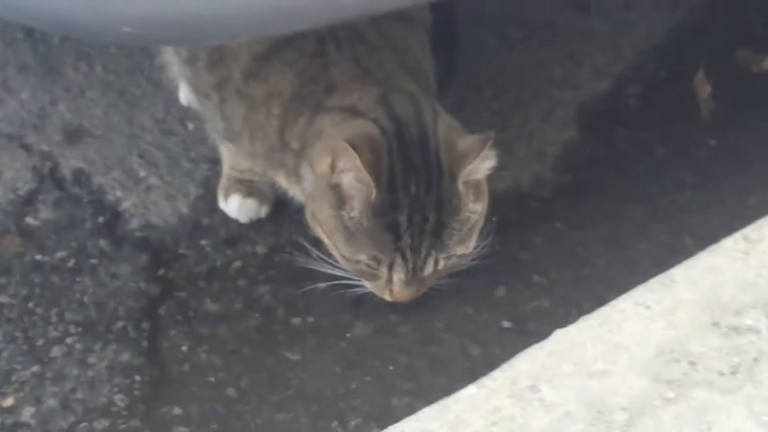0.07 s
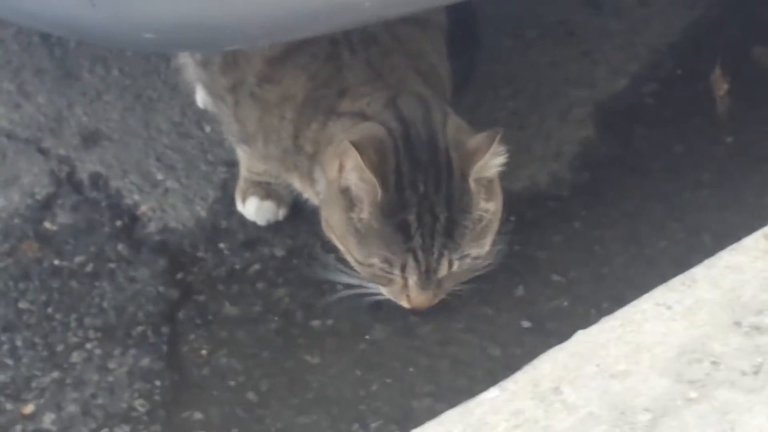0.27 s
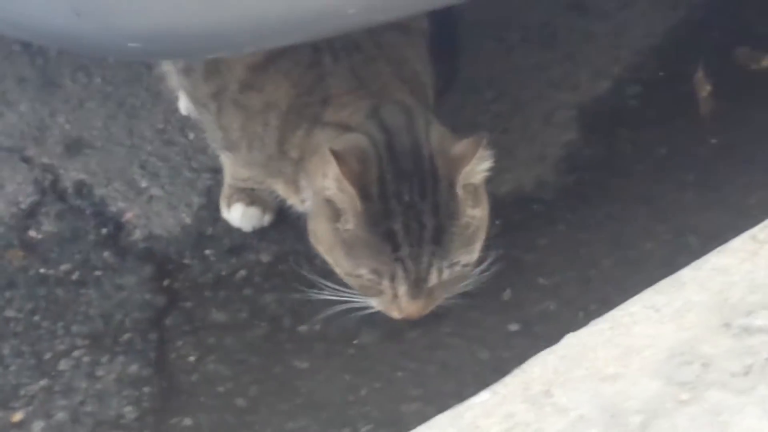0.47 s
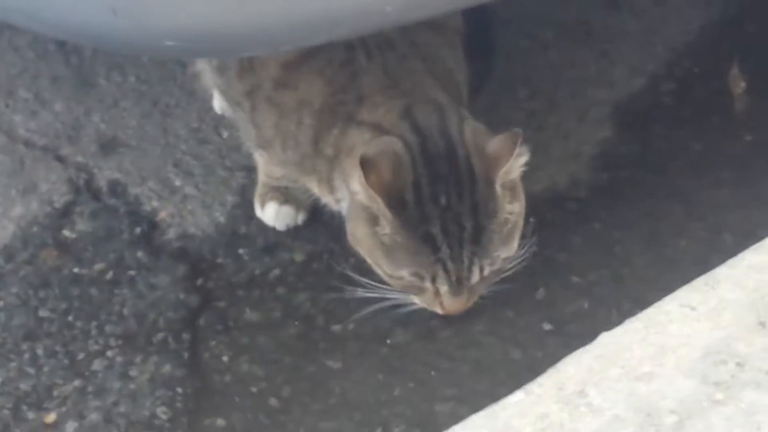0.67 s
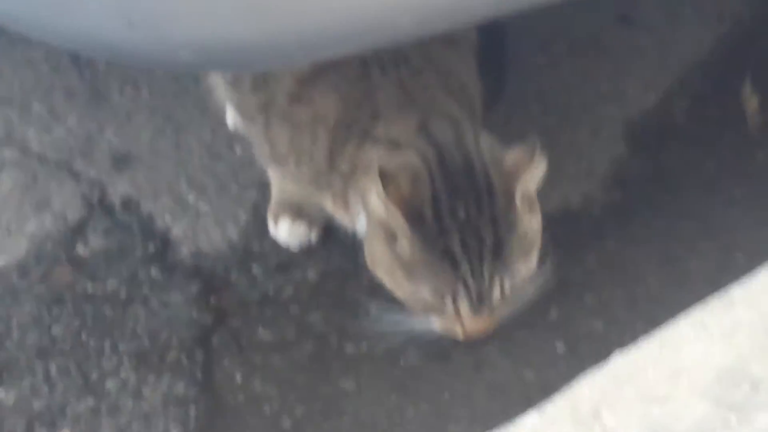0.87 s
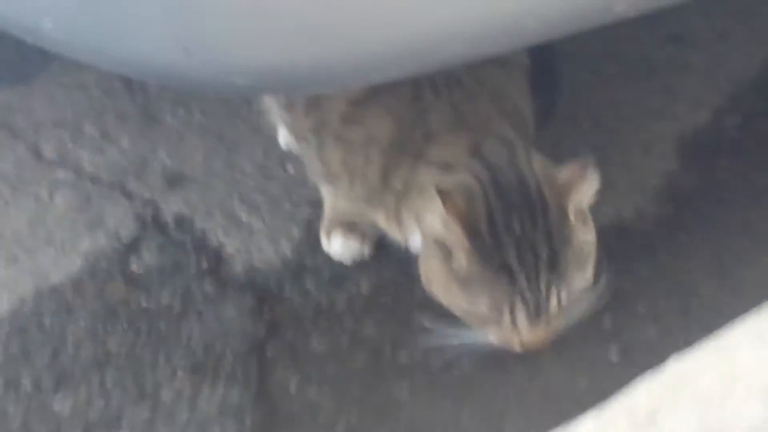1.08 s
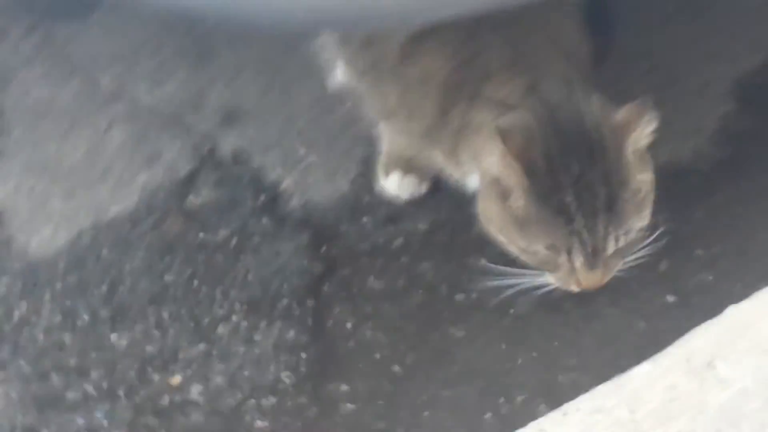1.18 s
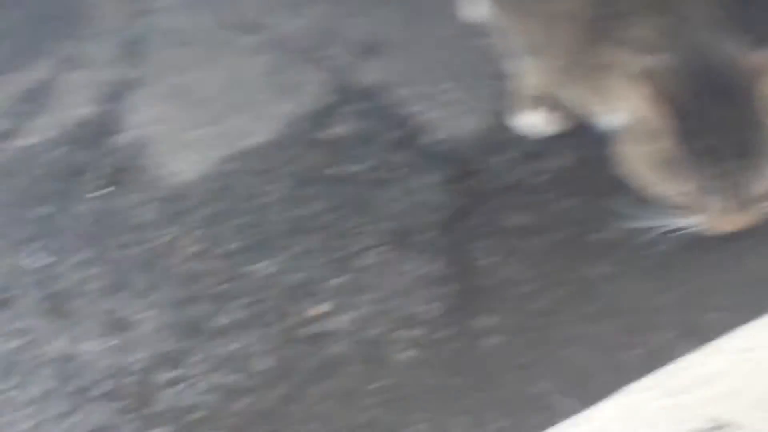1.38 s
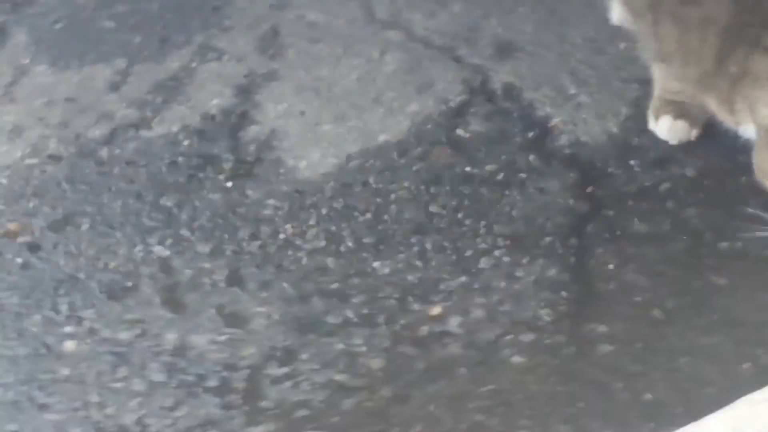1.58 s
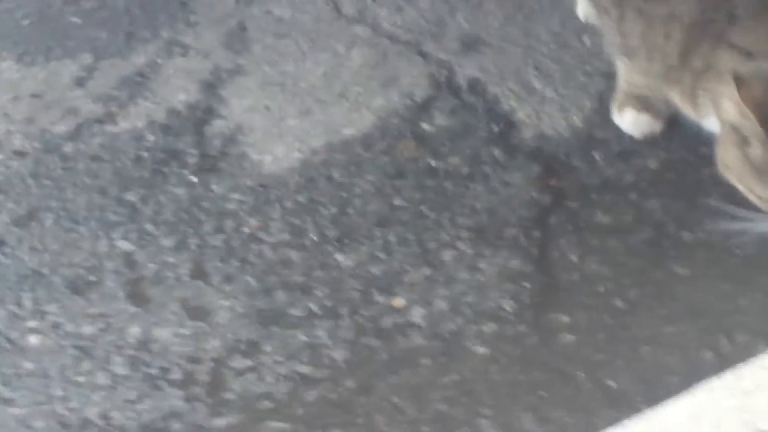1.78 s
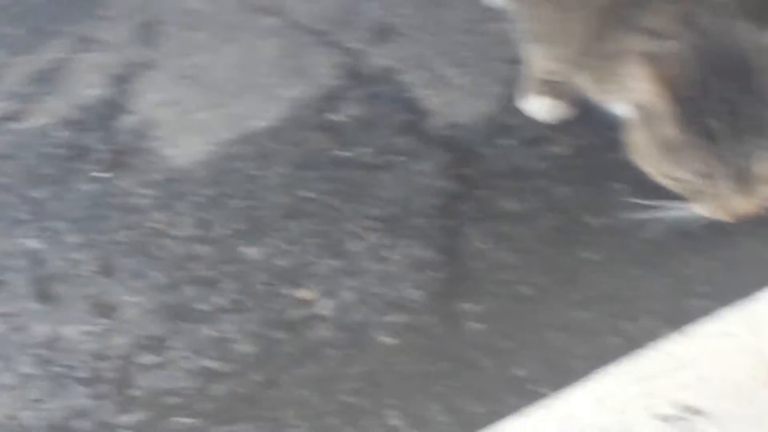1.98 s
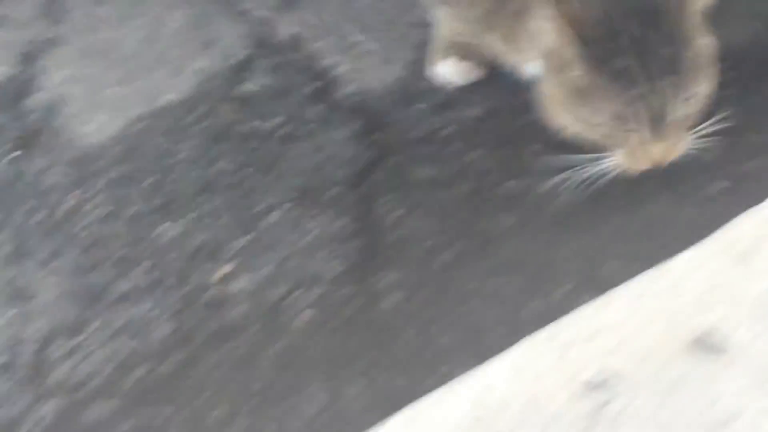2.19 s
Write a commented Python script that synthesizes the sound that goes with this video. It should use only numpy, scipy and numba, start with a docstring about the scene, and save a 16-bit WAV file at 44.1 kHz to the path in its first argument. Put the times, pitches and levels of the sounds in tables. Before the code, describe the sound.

Low roadside traffic rumble and hiss swell, then fade, with sharp camera handling clicks.

```python
"""Roadside traffic: engine rumble, a low steady hum, tyre roar and a high hiss. They swell as the
hand-held camera swings aside, then sink away. Fingers click on its casing by the left microphone;
the hardest click overloads it and the limiter ducks briefly. Later a fingertip brushes the casing
with three faint stick-slip squeaks."""
import sys
import numpy as np
from scipy import signal
from scipy.fft import rfft, irfft
from scipy.io import wavfile
from scipy.ndimage import uniform_filter1d, minimum_filter1d
from numba import njit

SR = 44100
rng = np.random.default_rng(int(sys.argv[2]) if len(sys.argv) > 2 else 0)


def waveform_to_disk(signal):
    """Save audio, clipped to [-1, 1], as 16-bit WAV at the path in sys.argv[1]."""
    frames = np.transpose(np.atleast_2d(signal))
    scaled = np.clip(frames, -1, 1) * 32767
    samples = np.round(scaled).astype(np.int16)
    wavfile.write(sys.argv[1], SR, samples)


N = 99225

# traffic levels: t/s, rumble/dB, drone/dB, tyre roar/dB
TRAFFIC_LEVELS = [(0, -50.5, -45.5, -48.5), (.28, -43.5, -47, -47.5), (.5, -44, -47, -48),
                  (.72, -53.5, -44.5, -48.5), (.9, -46.5, -48, -47.5), (1.1, -45, -40.5, -49),
                  (1.22, -45.5, -39, -45), (1.34, -48, -40.5, -50), (1.45, -49.5, -47, -57.5),
                  (1.65, -61, -61.5, -64), (1.92, -59, -60.5, -63), (2.08, -57.5, -62, -67.5),
                  (2.25, -61, -64.5, -63.5)]


def undb(db):
    """Decibels to gain."""
    return 10 ** (np.asarray(db) / 20)


def unit(x):
    """Scale to rms 1."""
    return x / np.sqrt(np.mean(x ** 2))


def curve(rows, column=1):
    """Table column interpolated over time."""
    rows = np.array(rows)
    return np.interp(np.arange(N) / SR, rows[:, 0], rows[:, column])


def per_bin(points):
    """(f/Hz, value) points interpolated over log frequency."""
    hz, value = np.array(points).T
    return np.interp(np.log(np.fft.rfftfreq(N, 1 / SR) + 1), np.log(hz), value)


def drift(rate_hz):
    """Smooth random drift, rms 1."""
    k = int(SR / rate_hz)
    steps = np.repeat(rng.standard_normal(N // k + 1), k)
    return unit(uniform_filter1d(uniform_filter1d(steps, k), k)[:N])


def wavering_sine(hz, wander, rate_hz):
    """Sine with drifting pitch; wander is the relative rms deviation."""
    phase = 2 * np.pi * np.cumsum(hz * (1 + wander * drift(rate_hz))) / SR
    return np.sin(phase)


def mode(hz, t60_s):
    """Damped sine, 20 ms."""
    t = np.arange(SR // 50) / SR
    return np.sin(2 * np.pi * hz * t) * np.exp(-np.log(1000) * t / t60_s)


def swell(start_s, length_s):
    """Rounded rise and fall."""
    progress = np.clip((np.arange(N) / SR - start_s) / length_s, 0, 1)
    return np.sqrt(np.abs(np.sin(np.pi * progress)))


def cut(x, hz, kind, order):
    """High-pass or low-pass."""
    return signal.sosfilt(signal.butter(order, min(hz, SR * .45), kind, fs=SR, output="sos"), x)


def diffuse_noise(spectrum):
    """Noise at two close microphones, alike in the bass; their mean has rms 1."""
    # left-right likeness: f/Hz, correlation
    likeness = [(60, 0.94), (130, 0.98), (290, 0.9), (640, 0.39), (1350, -0.36), (2500, 0.033),
                (6800, 0.14), (15000, -0.85)]
    # balance: f/Hz, left minus right/dB
    balance = [(100, 0), (1000, 1.1), (2400, 0.5), (4600, 5), (6200, 2.5), (8100, -11), (15000, 0.5)]
    mid, side = rfft(rng.standard_normal((2, N)))
    correlation = np.clip(per_bin(likeness), -1, 1)
    sign = np.array([[1], [-1]])
    pair = np.sqrt(1 + correlation) * mid + sign * np.sqrt(1 - correlation) * side
    pair = irfft(pair * undb(per_bin(spectrum) + sign * per_bin(balance) / 2), N)
    return pair / np.std(pair.mean(axis=0))


def hiss():
    """Smooth traffic hiss in three bands: upper-mid wash, treble, top sheen."""
    # spectra: f/Hz, relative level/dB
    wash_spectrum = [(700, -37.5), (1200, 6), (1800, 3), (2500, 0.5), (3300, 0.5), (4500, -7),
                     (8000, -54.5)]
    treble_spectrum = [(2000, -24.5), (3300, -4.5), (3950, -2), (4700, 2), (5800, 2), (6600, -1.5),
                       (8300, -14), (10000, -21), (15000, -27)]
    sheen_spectrum = [(4000, -35), (6000, -3.5), (7200, 3.5), (8600, -2.5), (9800, -6.5), (12000, -8),
                      (15000, -15), (16000, -26)]
    # t/s, level/dB
    wash_level = [(0, -56), (.4, -57), (.55, -58), (.85, -57.5), (.97, -55), (1.12, -55), (1.3, -53),
                  (1.43, -62.5), (1.6, -71), (1.9, -72.5), (2.1, -76.5), (2.25, -75.5)]
    # t/s, treble/dB, sheen/dB
    high_levels = [(0, -51.5, -52.5), (.25, -52.5, -54), (.5, -54.5, -58.5), (.75, -57, -61),
                   (.92, -55.5, -59), (1.1, -52.5, -54), (1.22, -49.5, -47), (1.34, -48.5, -49),
                   (1.39, -56.5, -56), (1.52, -61, -62), (1.63, -68, -74), (1.82, -68, -71.5),
                   (2.05, -73, -77), (2.25, -72, -75)]
    treble = diffuse_noise(treble_spectrum) * undb(curve(high_levels, 1))
    sheen = diffuse_noise(sheen_spectrum) * undb(curve(high_levels, 2))
    wash = diffuse_noise(wash_spectrum) * undb(curve(wash_level))
    return wash + treble + sheen


def tyres():
    """Midrange roar of rolling tyres, fluttering slightly."""
    # f/Hz, relative level/dB
    spectrum = [(150, -14.5), (300, -0.5), (450, 0), (600, -1), (780, -.5), (865, 2.5), (950, -3.5),
                (1100, -8.5), (1500, -14.5), (2500, -65.5)]
    return diffuse_noise(spectrum) * undb(curve(TRAFFIC_LEVELS, 3) + 0.27 * drift(22))


def engines(flutter_db=1.2):
    """Engines rumble and drone; each band flutters independently."""
    # spectra: f/Hz, relative level/dB
    rumble_spectrum = [(20, -30), (38, -8.5), (60, -5), (85, 2), (112, 2.5), (135, 0), (180, -11),
                       (300, -39.5)]
    drone_spectrum = [(80, -13), (130, -0.5), (175, 1), (215, 2), (290, -7), (400, -15), (700, -41)]
    rumble = diffuse_noise(rumble_spectrum) * undb(curve(TRAFFIC_LEVELS, 1) + flutter_db * drift(18))
    drone = diffuse_noise(drone_spectrum) * undb(curve(TRAFFIC_LEVELS, 2) + flutter_db * drift(18))
    return rumble + drone


def engine_hum(firing_hz=55.7, flutter_db=0.5):
    """Firing note of an engine at steady speed, wavering a little."""
    # t/s, level/dB
    level = [(0, -43), (.3, -45), (1, -42.5), (1.3, -42.5), (1.42, -71), (1.56, -63), (1.8, -65),
             (2.25, -73.5)]
    note = wavering_sine(firing_hz, wander=0.028, rate_hz=11)
    return note * undb(curve(level) + flutter_db * drift(16))


def traffic_resonances():
    """A narrow boom and a high sizzle swell in the traffic and fade."""
    # t/s, length/s, f/Hz, width/Hz, level/dB
    resonances = [(0.46, 0.73, 179.4, 24, -47), (0.15, 0.5, 5600, 250, -60.5)]
    hz = np.fft.rfftfreq(N, 1 / SR) + 1
    out = np.zeros((2, N))
    for start_s, length_s, centre_hz, width_hz, db in resonances:
        band_db = -20 * np.log10(1 + ((hz - centre_hz) / width_hz) ** 2)
        out += diffuse_noise(np.column_stack([hz, band_db])) * undb(db) * swell(start_s, length_s)
    return out


def brush(level_db=-63.5, flutter_db=2.7):
    """A fingertip rubs the casing: uneven friction in two resonances."""
    # f/Hz, width/Hz, relative level/dB
    rings = [(1900, 250, 0), (4380, 650, -9)]
    hz = np.fft.rfftfreq(N, 1 / SR)
    response = sum(undb(db) / (1 + 2j * (hz - centre_hz) / width_hz) for centre_hz, width_hz, db in rings)
    rub = unit(irfft(rfft(rng.standard_normal((2, N))) * response, N))
    return rub * undb(level_db + flutter_db * drift(120.6)) * swell(start_s=1.670, length_s=0.066)


def squeaks():
    """The brushing fingertip sticks and slips: short, nearly pure notes."""
    # t/s, length/s, f/Hz, level/dB
    notes = [(1.677, .013, 4600, -64.5), (1.701, 0.009, 4560, -60.5), (1.714, .013, 4550, -66)]
    out = np.zeros(N)
    for start_s, length_s, hz, db in notes:
        note = unit(wavering_sine(hz, wander=0.003, rate_hz=300))
        out += note * undb(db) * swell(start_s, length_s)
    return out


def scrape(response, level_db=-28):
    """Brief finger friction: noise coloured by an impulse response."""
    friction = unit(signal.fftconvolve(rng.standard_normal(N), response)[:N])
    return friction * undb(level_db) * swell(start_s=1.3515, length_s=0.017)


def finger_clicks():
    """Light clicks tick; firm clicks add a low, overloaded knock. A scrape surrounds the hardest."""
    # casing: f/Hz, t60/s, left/dB, right/dB
    casing_modes = [(4720, 0.0028, -6, -39), (5560, 0.0033, -0.5, -35.5), (6470, 0.0035, -22.5, -3.5),
                    (7290, 0.0038, -24.5, -8.5), (8700, 0.002, -22, -15.5), (9900, 0.001, -16, -17),
                    (13500, .002, -29, -26.5)]
    # low knock: f/Hz, t60/s, level/dB
    knock_modes = [(300, 0.0061, -7), (1330, 0.0049, -9.5), (2190, 0.005, -5), (3080, 0.003, -9)]
    # t/s, left gain/dB, right gain/dB, knock gain/dB, low-pass/Hz
    clicks = [(1.2698, -17, -25, -20, 12000), (1.2709, -4, -7.5, -23, 14900), (1.3549, -16, -39, -2, 8100),
              (1.3628, 9.5, -34, -2.5, 5650), (1.598, -40, -37, -22, 9000)]
    tick = sum(undb([[left], [right]]) * mode(hz, t60_s) for hz, t60_s, left, right in casing_modes)
    tick = cut(tick, 3940, "high", order=9)
    knock = sum(undb(db) * mode(hz, t60_s) for hz, t60_s, db in knock_modes)
    knock = cut(knock, 128.9, "high", order=2)
    out = np.zeros((2, N))
    for start_s, left_db, right_db, knock_db, lowpass_hz in clicks:
        i = int(start_s * SR)
        click = cut(tick + undb(knock_db) * knock, lowpass_hz, "low", order=3)
        out[:, i:i + len(knock)] += undb([[left_db], [right_db]]) * click
    out[0] += scrape(tick[0] + undb(-4.0) * knock)  # left only
    return out


def scene():
    """Traffic all round, handling right at the microphones."""
    traffic = engines() + tyres() + hiss() + engine_hum() + traffic_resonances()
    return traffic + finger_clicks() + brush() + squeaks()


@njit
def follow(x, attack_s, release_s):
    """Level follower with separate rise and fall times."""
    out, level = np.empty(len(x)), 0.
    for i in range(len(x)):
        level += (x[i] - level) / (SR * (attack_s if x[i] > level else release_s))
        out[i] = level
    return out


def record(dry):
    """A limiter ducks late and holds briefly; the overload saturates and the top is cut."""
    limit_db, lag_s, hold_s, top_hz = -8.5, 0.0011, 0.016, 15700
    level = follow(np.abs(dry).max(axis=0), attack_s=0.0005, release_s=0.003)
    hold = int(hold_s * SR)
    gain = minimum_filter1d(np.minimum(1, undb(limit_db) / (level + 1e-9)), hold)
    late_gain = np.interp(np.arange(N) - hold / 2 - lag_s * SR, np.arange(N), gain)
    lowpass = signal.ellip(8, .2, 70, top_hz, fs=SR, output="sos")
    return signal.sosfilt(lowpass, np.clip(dry * late_gain, -1, 1))


dry = scene()
out = record(dry)
waveform_to_disk(out)
```